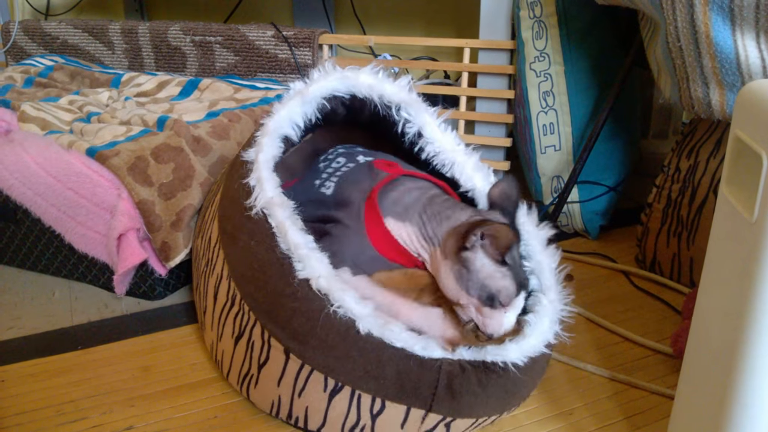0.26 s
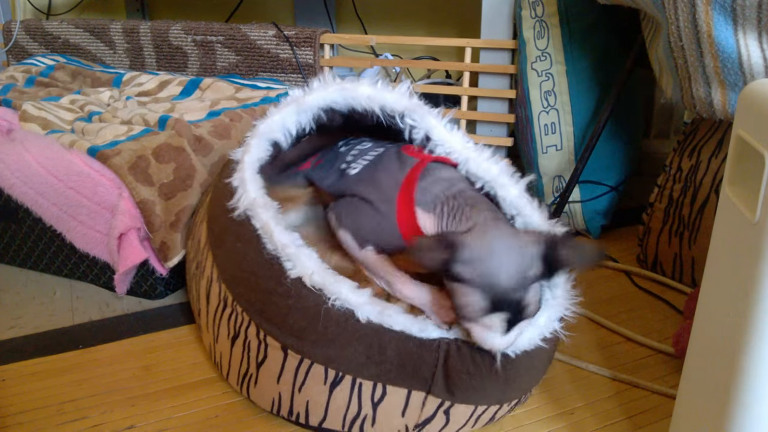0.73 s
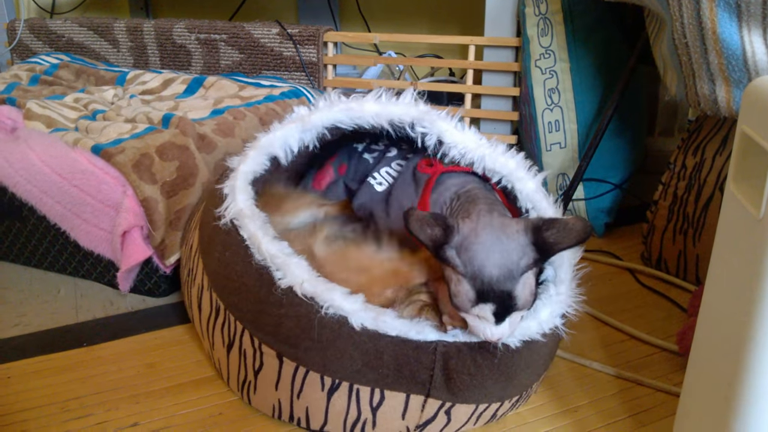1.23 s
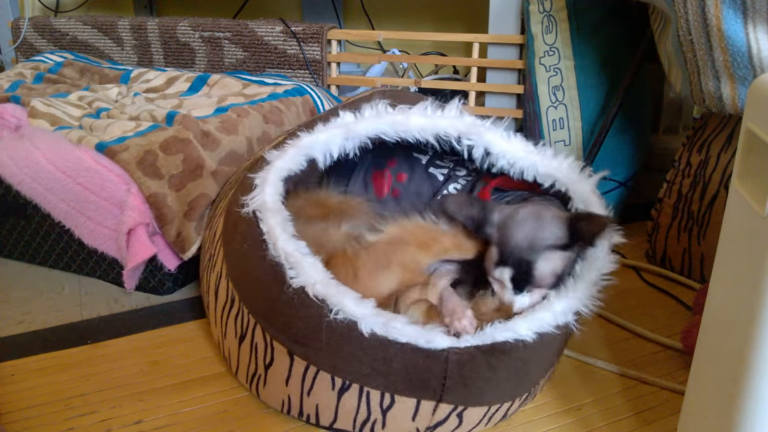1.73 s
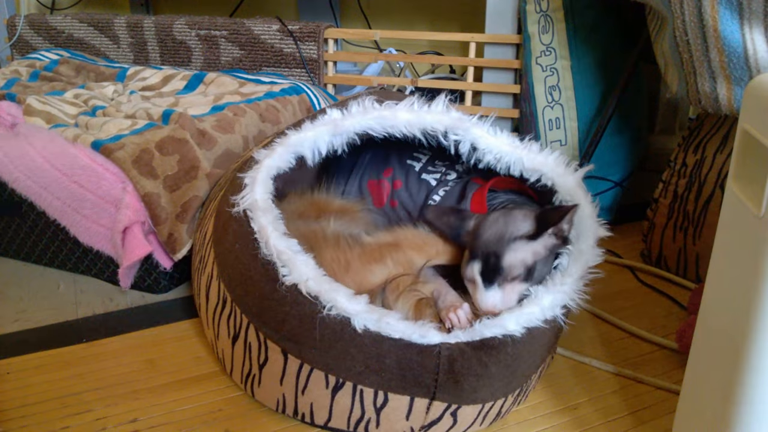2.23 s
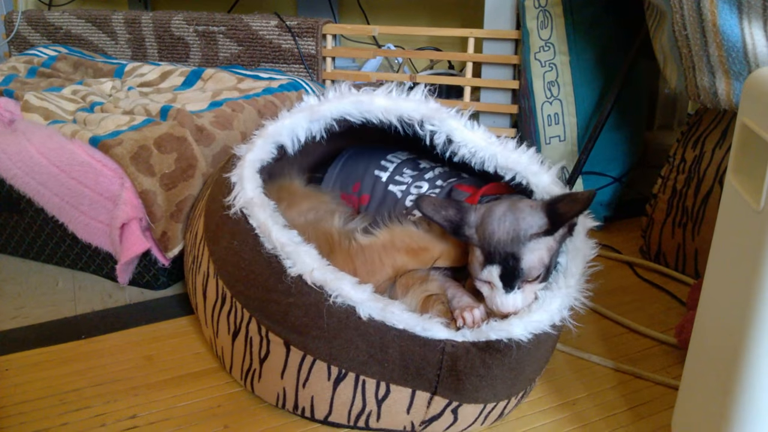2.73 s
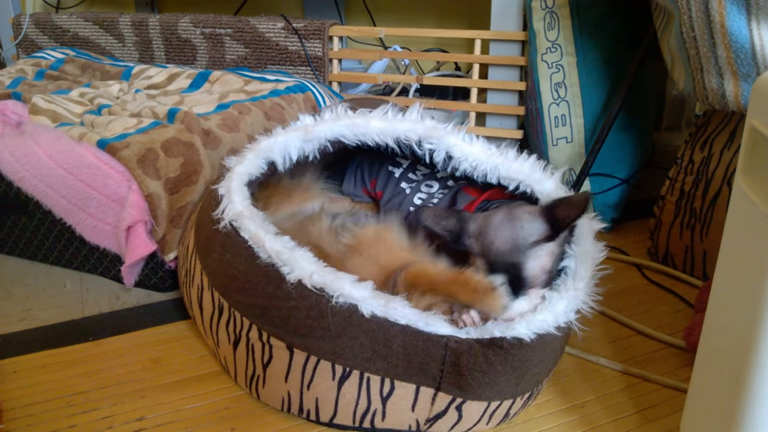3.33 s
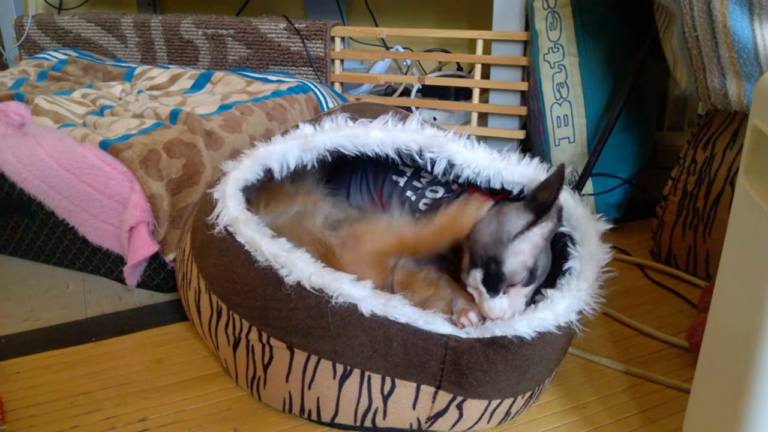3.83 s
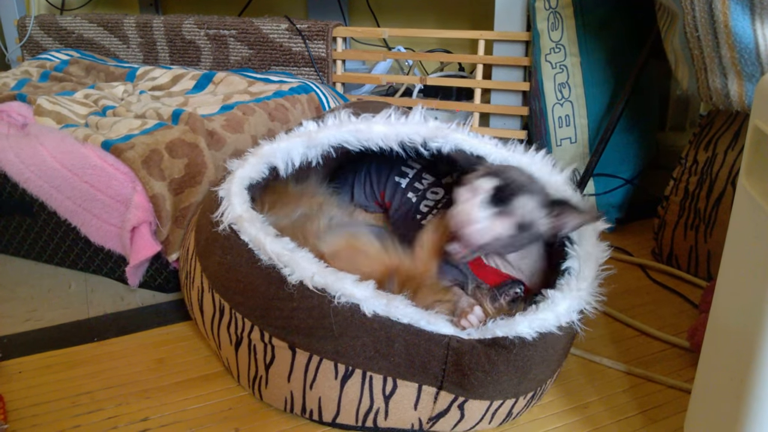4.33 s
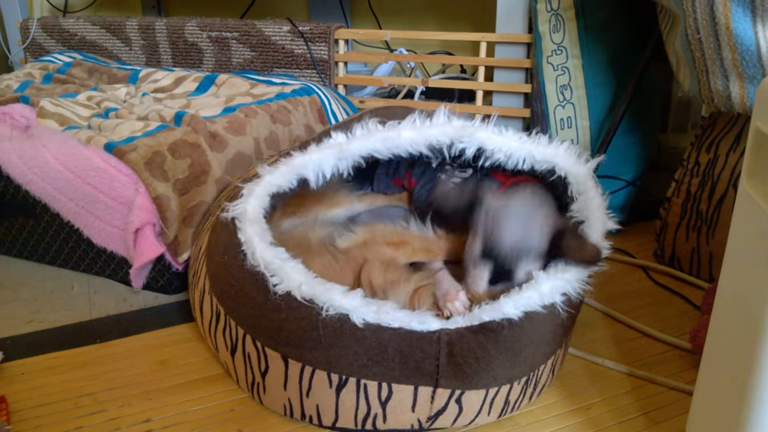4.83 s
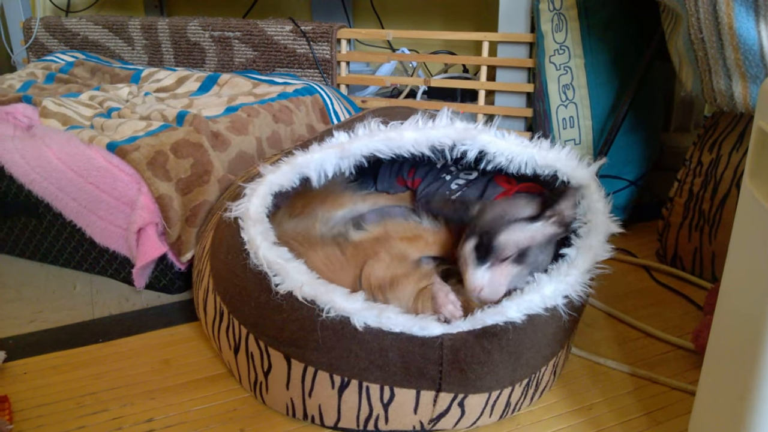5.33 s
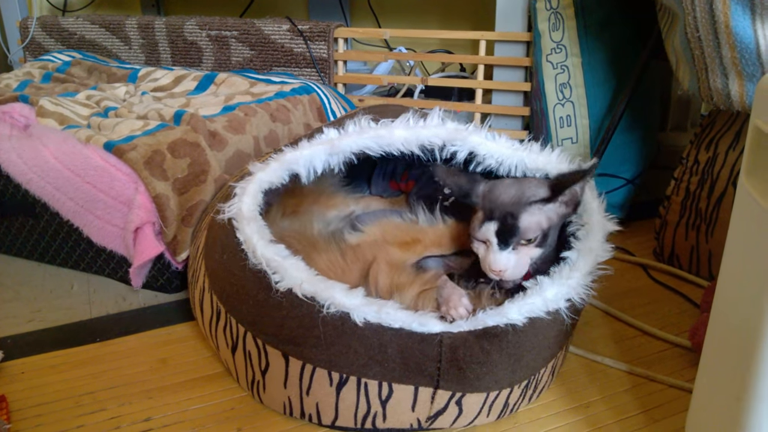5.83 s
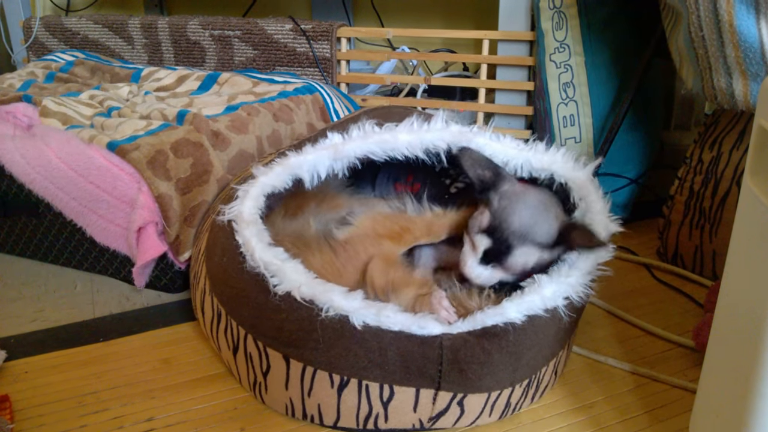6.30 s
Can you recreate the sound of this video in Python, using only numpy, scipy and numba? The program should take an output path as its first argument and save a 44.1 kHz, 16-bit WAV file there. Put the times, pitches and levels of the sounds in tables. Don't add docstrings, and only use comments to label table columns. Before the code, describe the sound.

A cat vocalizes close to a small camera in a furnished room with a short, soft echo, over low rumble, faint hum and steady hiss. It starts at once with a high cry that cracks and sinks until about 0.4 s. A faint bark and yelp come near 0.6, a sharp bark at 0.85, then three gruff grunts between 1.2 and 1.4, and two cracked yelps at 1.6 and 1.7. Soft sniffs at 2.0 and 2.1 lead to a small whimper and a stumbling low voice. From 2.5 to 4.7 a long, nasal, wavering moan swells and catches. A short, rough squeal follows at 4.9 to 5.1. Hoarse sniffs come at 5.3 to 5.4, then a faint whine and low creaky pushes from 5.5. The rattling growl climbs from 5.9 and breaks at 6.2 into a loud, cracking yowl lasting to the end.

```python
import sys
import numpy as np
from scipy import signal
from scipy.fft import rfft, irfft, next_fast_len
from scipy.io import wavfile
from scipy.ndimage import uniform_filter1d, map_coordinates
from numba import njit

SR = 44100
rng = np.random.default_rng(int(sys.argv[2]) if len(sys.argv) > 2 else 0)


def volts_from_decibels(level):
    exponent = np.asarray(level, float) / 20
    return 10 ** exponent


def int16_out(signal):
    q = np.round(np.clip(np.atleast_2d(signal).T, -1, 1) * 32767)
    wavfile.write(sys.argv[1], SR, q.astype(np.int16))


N = 289296


def along(points, hz):
    f, v = np.transpose(points)
    return np.interp(np.log(hz + 1), np.log(f + 1), v)


def curves(rows):
    s, *cols = np.transpose(rows)
    return [np.interp(np.arange(N) / SR, s, c) for c in cols]


def bumps(rows, width_s):
    t = np.arange(N) / SR
    widths = np.broadcast_to(width_s, len(rows))
    return sum(h * np.exp(-((t - s) / w) ** 2) for (s, h), w in zip(rows, widths))


def wobble(rate):
    knots = rng.standard_normal(int(N * rate / SR) + 4)
    return map_coordinates(knots, [np.arange(N) * rate / SR])


def filtered(x, response):
    m = next_fast_len(N + SR // 2)
    return irfft(rfft(x, m) * response(np.fft.rfftfreq(m, 1 / SR)), m)[..., :N]


def modes(table):
    def response(f):
        total = 0
        for k, (centre, width, db) in enumerate(table):
            band = 1j * f * width
            total = total + (-1) ** k * volts_from_decibels(db) * band / (centre * centre - f * f + band)
        return total
    return response


def steady(x):
    power = uniform_filter1d(uniform_filter1d(x * x, size=1200), size=1200)
    return x / np.sqrt(np.abs(power) + 1e-20)


@njit
def moving(x, turn, r):
    y = np.zeros(len(x))
    for n in range(2, len(x)):
        y[n] = (1 - r * r) / 2 * (x[n] - x[n - 2]) + 2 * r * turn[n] * y[n - 1] - r * r * y[n - 2]
    return y


def swept(x, hz, width_hz):
    turn, r = np.cos(2 * np.pi * hz / SR), np.exp(-np.pi * width_hz / SR)
    return moving(moving(x, turn, r), turn, r)


def air():
    # pitch_hz, level_db [dB per Hz]
    air_spectrum = [(20, -50), (55, -3), (120, -7), (250, -13.5), (500, -18.5), (1000, -22), (2500, -26.5),
                    (4000, -27.5), (5500, -27.5), (7000, -37), (9000, -37), (17000, -35)]
    tone = filtered(rng.standard_normal(N), lambda f: volts_from_decibels(along(air_spectrum, f)))
    rumble = filtered(tone, lambda f: 1 / (1 + (f / 400) ** 2))
    tone = tone + rumble * (volts_from_decibels(0.39 * wobble(0.63)) - 1)
    hum_hz, hum_db, air_db = 59.5, -70, -63.5
    hum = volts_from_decibels(hum_db + 1.1 * wobble(3.75)) * np.sin(2 * np.pi * hum_hz * np.arange(N) / SR)
    return volts_from_decibels(air_db) * tone / np.std(tone) + hum


def short(events, rise_s, fall_s, onset, rest_hz, knee_db, knee_open_db, late_db):
    onset_db, end_db = -40, -45
    mouth_per_pitch = 4.71
    sag_drags = 1.5
    calls = []
    for s, db, hz, sag, open_db in events:
        mouth_hz = rest_hz + mouth_per_pitch * hz
        end_s = fall_s * (1 + sag_drags * sag)
        low_hz = hz * (1 - sag)
        calls.append([
            (s - rise_s, hz * onset, db + onset_db, open_db - 8, mouth_hz),
            (s - 0.589 * rise_s, hz * (1 + onset) / 2, db + knee_db, open_db + knee_open_db, mouth_hz),
            (s, hz, db, open_db, mouth_hz),
            (s + .65 * end_s, low_hz, db + late_db, open_db - 6.0, 0.81 * mouth_hz),
            (s + end_s, low_hz, db + END_OPEN_SAFE(end_db), open_db + 6, 0.7 * mouth_hz)])
    return calls


def END_OPEN_SAFE(db):
    return db


def held(call, chest_db, palate_db):
    return [(*row, chest_db, palate_db) for row in call]


def phrases():
    # start_s, pitch_hz, effort_db, mouth_open_db, mouth_hz
    cry = [(0, 496, -64, 25.5, 1400), (.01, 517, -59, 2.5, 1410), (.046, 465.2, -56, 26, 1650),
           (.064, 460.5, -41, 7, 1820), (.075, 472.6, -48.5, 18, 1820), (.095, 447, -46, 9.5, 1920),
           (.108, 482, -50, -6, 1760)]
    sink = [(.112, 588, -45.5, 2, 1860), (.13, 609, -62.5, 4, 1810), (.17, 450, -46, 4, 1410),
            (.216, 407, -43, -8.5, 1500), (.275, 430.3, -48.5, -19, 1320), (.299, 365, -49.5, 0, 1313),
            (.333, 313, -56, -5, 1222), (.367, 310, -51.5, 1, 1255), (.43, 301.5, -87, -1, 1363)]
    stumble = [(2.332, 300, -66, -16, 1795), (2.345, 270.3, -55, -12, 1760), (2.364, 198.5, -50, -7, 1747),
               (2.378, 163.3, -53, -3, 1570), (2.402, 150.6, -61, -19, 1546), (2.422, 149, -98, -14, 1544),
               (2.436, 245.5, -50, -23, 1548), (2.448, 214, -83, -19, 1515)]
    moan = [(2.455, 202.6, -61, -26, 1448), (2.5, 230.3, -51.5, -12.5, 1250),
            (2.78, 231.7, -52, -7.5, 1360), (2.83, 243.3, -48, -5, 1698), (2.92, 249, -49.5, -7, 2010),
            (3.12, 245.7, -46, -8.5, 1770), (3.19, 277.2, -42, -14.5, 1838), (3.33, 272.8, -46, -5, 1820),
            (3.47, 271.7, -45, -16, 1530), (3.59, 248.2, -45, -6.5, 1733), (3.75, 230.5, -50, -5, 1580),
            (3.87, 240.6, -50, -3.5, 1620), (4.05, 227.4, -49.5, -11, 1511), (4.21, 218.7, -50.5, 1, 1586),
            (4.39, 238.3, -49, -2, 1530), (4.46, 233.7, -48, -11, 1502), (4.69, 258.9, -54, -10, 1765),
            (4.75, 260.4, -102, -25, 1560)]
    squeal = [(4.89, 400, -99, -10, 1953), (4.9, 385, -58.5, -2, 1860), (4.924, 404, -44, -7.5, 1924),
              (4.963, 395, -54.5, 7.5, 1880), (4.968, 439.8, -46, -21, 1562),
              (4.987, 376.3, -49.5, 2, 1665), (5.003, 348.6, -47, -6, 1826), (5.06, 339.9, -53, 0.5, 1954),
              (5.1, 330, -83, 2, 1969)]
    whine = [(5.44, 252, -64, -17, 1950), (5.468, 245, -80, -9, 1870), (5.5, 235, -64, -21, 1580),
             (5.518, 226, -83, -7, 1563)]
    creak = [(5.53, 160, -81, -5, 1410), (5.576, 152.3, -44, -7.5, 1395), (5.627, 144, -78, -3, 1591),
             (5.666, 129.9, -54, 5.5, 1802), (5.71, 97.2, -61.5, 8, 1842), (5.738, 98.45, -67, -1, 1828),
             (5.8, 128.4, -50, 3.5, 1768), (5.835, 111, -54.5, -5.5, 1720), (5.87, 111.7, -58, -2, 1568)]
    growl = [(5.875, 115.4, -55.5, -2.5, 1442), (5.937, 111.6, -55, -5, 1441),
             (5.981, 167.6, -52, -15, 1396), (6.013, 155, -54, -0.5, 1454), (6.121, 189.2, -47, 7.5, 1807),
             (6.165, 229.7, -50, 9, 1846)]
    yowl = [(6.17, 324.5, -45.5, -3, 1990), (6.206, 404.4, -45.5, 1.5, 2008), (6.306, 450.2, -46, 3, 2028),
            (6.318, 416, -46, 6, 2136), (6.347, 325, -60.5, 4.5, 1988), (6.394, 429, -46.5, -3.5, 1840),
            (6.474, 345.4, -48, 5, 1510), (6.51, 387.7, -44, -7, 1377), (6.56, 357.6, -44.5, 4, 1446)]
    # peak_s, effort_db, pitch_hz, pitch_sag [share], mouth_open_db
    barks = [
        (.55, -76, 180.1, 0.029, 9),
        (.849, -39, 232, .01, 4.5),
        (2.236, -43, 203, 0.02025, 0.5),
    ]
    yelps = [
        (.625, -62, 374.2, .05, -6),
        (1.572, -38.5, 328.8, 0.00028, 4),
        (1.728, -43, 332, 0, 5.5),
    ]
    grunts = [
        (1.186, -43, 187.5, .03, 0.5),
        (1.303, -45.5, 170, .28, -5),
        (1.424, -41, 189.4, .25, 2.5),
    ]
    # rise_s, fall_s, onset_pitch [share], resting_mouth_hz,
    # effort_db and mouth_open_db halfway up, effort_db late in the fall
    bark_shape = (.037, .045, 1.2, 900, -11, -3, -24)
    yelp_shape = (0.0643, 0.07, 0.88, 406, -4, -14.5, -18)
    grunt_shape = (.047, .036, 1.02, 960, -10, -7, -15)
    calls = [held(cry, chest_db=-18, palate_db=-4.1), held(sink, .1, -4), held(stumble, -3, 3.7)]
    calls += [held(moan, .1, 0.11), held(squeal, .1, 10), held(creak, -1.4, -2)]
    calls += [held(whine, .1, 3), held(growl, -3, 1.3), held(yowl, 0.092, -2)]
    calls += [held(c, 1.5, 3) for c in short(grunts, *grunt_shape)]
    calls += [held(c, 1.5, -.1) for c in short(yelps, *yelp_shape)]
    calls += [held(c, -1.5, 4) for c in short(barks, *bark_shape)]
    return sorted(calls)


def sounding(tables, fade_s):
    t = np.arange(N) / SR
    spans = [(c[0][0], c[-1][0]) for c in tables]
    return np.clip(sum(np.interp(t, [a - fade_s, a, b, b + fade_s], [0, 1, 1, 0]) for a, b in spans), 0, 1)


def folds(pitch_hz):
    # start_s, roughness [0-1]
    closing = [(0, .1), (.28, .1), (.36, .3), (.8, .26), (1.45, .22), (1.55, .14), (2.2, .24), (2.5, .13),
               (4.9, .14), (5.0, .3), (5.55, .25), (5.65, .5), (6.1, .42), (6.21, .15), (6.56, .1)]
    # peak_s, added_roughness [0-1]
    cracks = [
        (.07, .1),
        (.12, .2),
        (1.592, .3),
        (1.745, .4),
        (6.16, .35),
        (6.35, .45),
        (6.45, .12),
    ]
    rough = curves(closing)[0] + bumps(cracks, .022)
    smooth = .11
    alternate = np.clip(rough - smooth, 0, .16)
    jitter = .013 * wobble(30) + .15 * rough * wobble(120) + .3 * rough ** 2 * wobble(40)
    phase = np.cumsum(pitch_hz * (1 + jitter)) / SR
    cycle = np.round(phase).astype(int)
    size = volts_from_decibels(9 * np.minimum(rough, .26) * rng.standard_normal(N)[cycle])
    size = size * (1 + alternate * (-1.) ** cycle / 2)
    sharp = np.exp(-pitch_hz / 3500)
    puffs = (1 - sharp ** 2) / (1 - 2 * sharp * np.cos(2 * np.pi * phase) + sharp ** 2) - 1
    gate = (1 + np.cos(2 * np.pi * (phase - .15))) ** 2
    gate = gate + 4 * rough ** 2 / smooth ** .5
    hiss = filtered(gate * rng.standard_normal(N), lambda f: .3 + .7 * (1j * f / (1300 + 1j * f)) ** 2)
    return steady(size * puffs) + 4 * rough * steady(hiss)


def pocket(f):
    centre_hz, wide_hz, depth_db = 3640, 1250, -5
    off, wide = centre_hz ** 2 - f * f, 1j * f * wide_hz
    return (off + volts_from_decibels(depth_db) * wide) / (off + wide)


def efforts(calls):
    # peak_s, pitch_lift [share], push_db, half_width_s
    swells = [
        (2.968, 0.099, 3.5, 0.033),
        (3.055, .13, 5, 0.023),
        (4.099, 0.052, 7, 0.024),
        (4.29, 0.00099, 4, 0.043),
        (4.519, 0.0283, 10.5, 0.0284),
        (4.645, .09, 11.5, .045),
        (6.232, .05, 0.2, .018),
        (6.25, 0.00069, 3, 0.023),
        (6.433, 0.01994, 5.5, 0.01755),
    ]
    # pitch_hz, level_db
    chesty = [(110, 10.5), (155, 13), (190, 9), (225, 9.5), (250, -2), (275, -3.5), (335, 2), (410, -8),
              (480, -8.5)]
    pitch_hz, throat_db, open_db, mouth_hz, chest_db, palate_db = curves(sum(calls, []))
    at_s, lift, swell_db, half_s = np.transpose(swells)
    pitch_hz = pitch_hz * (1 + bumps(list(zip(at_s, lift)), half_s))
    throat_db = throat_db + bumps(list(zip(at_s, swell_db)), half_s)
    easy_db, chest_follows = -50.5, 0.55
    chest_db = chest_db + easy_db + chest_follows * (throat_db - easy_db) + along(chesty, pitch_hz)
    mouth_db = throat_db + open_db
    palate_db = palate_db + mouth_db - 6.5 + 12.5 * (mouth_hz - 1800) / 1000
    return pitch_hz, mouth_hz, chest_db, throat_db, mouth_db, palate_db


def cat():
    # peak_s, push_db (negative: softer), pitch_drop
    catches = [
        (0.065, -4.5, 0.0201),
        (1.742, -4.5, 0.39),
        (3.365, 0.5, 0.3),
        (4.038, 2.5, .1),
        (4.133, 2, 0.094),
        (4.705, 11.5, .2),
        (5.063, -2, 0.26),
        (6.247, 1.5, 0.056),
        (6.262, -1, 0.049),
    ]
    # centre_hz, width_hz, level_db
    chest_modes = [(155, 244, 5.5), (433, 85, -6.5)]
    throat_modes = [(784, 193, 12), (988, 31, 0)]
    jaw_modes = [(1265, 150, 0)]
    palate_modes = [(3288, 414, 5)]
    rasp_modes = [(4030, 280, -10), (4825, 190, 21)]
    # pitch_hz, level_db above the throat
    gape = [(110, -16), (190, -5.5), (260, -18.5), (335, -6.5), (410, -4.5), (480, 2.5)]
    # start_s, whistle_hz, whistle_db above the palate, palate_hz
    lips = [(.1, 6300, -14.5, 2460), (.8, 5660, -28.5, 2590), (2.9, 5849, -15.5, 2560),
            (4.2, 5726, -21, 2650), (4.4, 6790, -21, 2670), (4.65, 8010, -19, 2430), (4.9, 5204, -39, 2650),
            (5.1, 6974, -22, 2650), (5.8, 7315, -19, 2529), (6, 5000, 2, 2600), (6.09, 5700, -16, 2650),
            (6.25, 5164, -14.5, 2986), (6.335, 5650, -10, 2957), (6.44, 5200, -12.5, 2840)]
    calls = phrases()
    pitch_hz, mouth_hz, chest_db, throat_db, mouth_db, palate_db = efforts(calls)
    t = np.arange(N) / SR
    push_db = sum(db * np.exp(-((t - s) / 0.0093) ** 2) for s, db, _ in catches)
    dip = sum(drop * np.exp(-((t - s) / .009) ** 2) for s, _, drop in catches)
    source = filtered(folds(pitch_hz * (1 - dip)), pocket)

    def twice(table):
        return filtered(source, lambda f: modes(table)(f) ** 2)

    def rounded(db):
        return uniform_filter1d(volts_from_decibels(db), size=450)

    whistle_hz, whistle_db, palate_hz = curves(lips)
    wander = .05
    palate = steady(swept(source, palate_hz * (1 + wander / 2 * wobble(9)), width_hz=364))
    palate = palate + volts_from_decibels(-13.5) * steady(twice(palate_modes))
    whistle = swept(source, whistle_hz * (1 + wander * wobble(14)), width_hz=1100)
    chest = filtered(twice(chest_modes), lambda f: 1 / (1 + 1j * f / 700) ** 2)
    thrum = filtered(rng.standard_normal(N), lambda f: modes([(66, 55, 0)])(f) ** 2)
    thrum_db = chest_db - 13 - 20 * np.log2(pitch_hz / 110)
    parts = [
        (chest_db, chest),
        (throat_db, twice(throat_modes)),
        (throat_db + along(gape, pitch_hz), twice(jaw_modes)),
        (mouth_db, swept(source, mouth_hz, width_hz=390)),
        (palate_db, palate),
        (palate_db - 25.5, twice(rasp_modes)),
        (palate_db + whistle_db, whistle),
        (thrum_db, thrum)]
    tremble_db = .8 * wobble(30)
    voice = sum(rounded(db) * steady(part) for db, part in parts)
    return sounding(calls, 0.0021) * volts_from_decibels(push_db + tremble_db) * voice


def room(x):
    # pitch_hz, t60_s
    decay = [(150, 0.028), (600, 0.17), (1500, 0.18), (6000, 0.038)]
    hz, t, z = signal.stft(rng.standard_normal(SR // 3), SR, nperseg=256)
    tail = signal.istft(z * volts_from_decibels(-60 * t / along(decay, hz)[:, None]), SR, nperseg=256)[1]
    return signal.fftconvolve(np.pad(x, (180, 0)), tail / np.linalg.norm(tail))[:N]


def intake():
    # peak_s, level_db, half_length_s
    sniffs = [
        (0.773, -79, 0.041),
        (2.013, -70.5, 0.035),
        (2.126, -68, 0.059),
        (5.305, -62, 0.042),
        (5.372, -67.5, 0.053),
        (5.424, -62.5, 0.037),
    ]
    # centre_hz, width_hz, level_db
    nose = [(2000, 1000, -9), (2650, 600, -3.5)]
    s, db, half_s = np.transpose(sniffs)
    breath = filtered(rng.standard_normal(N), lambda f: modes(nose)(f) ** 2)
    return bumps(list(zip(s, volts_from_decibels(db))), half_s / 2) * volts_from_decibels(1.5 * wobble(28)) * steady(breath)


def scene():
    voice = cat() + intake()
    answer = filtered(room(voice), lambda f: (1j * f / (900 + 1j * f)) ** 2)
    return (voice + volts_from_decibels(-8) * answer + air())[None]


def low_pass(x):
    return signal.sosfilt(signal.butter(12, 17180, fs=SR, output="sos"), x)


def record(dry):
    kept = filtered(dry, lambda f: f < 17180)
    return low_pass(kept)


dry = scene()
out = record(dry)
int16_out(out)
```